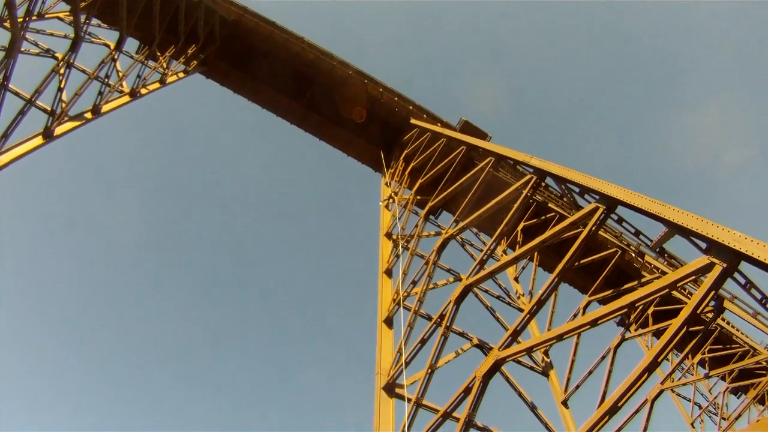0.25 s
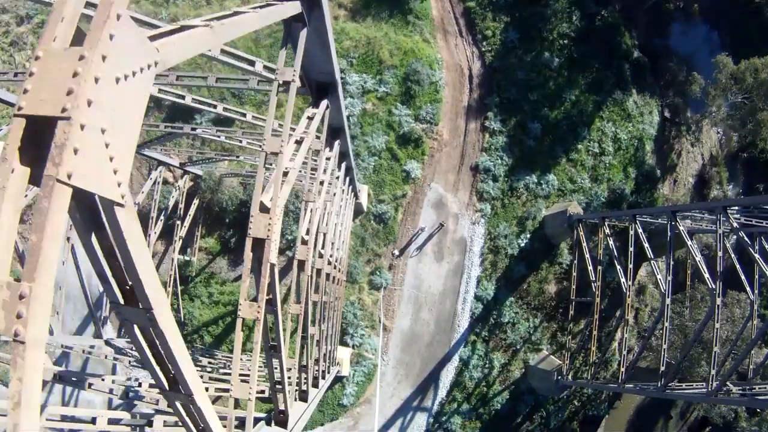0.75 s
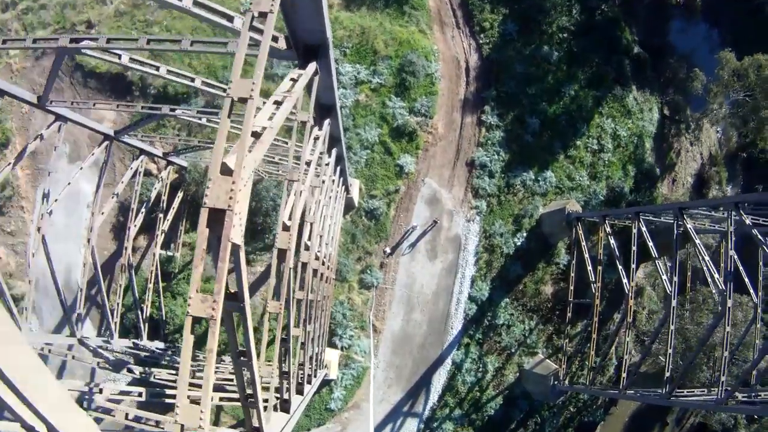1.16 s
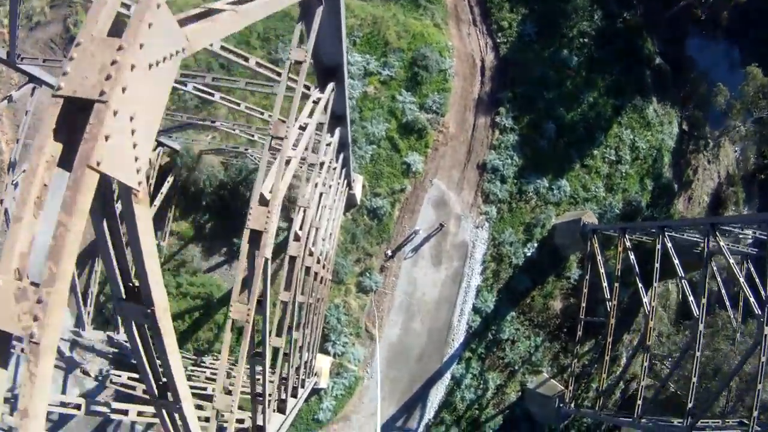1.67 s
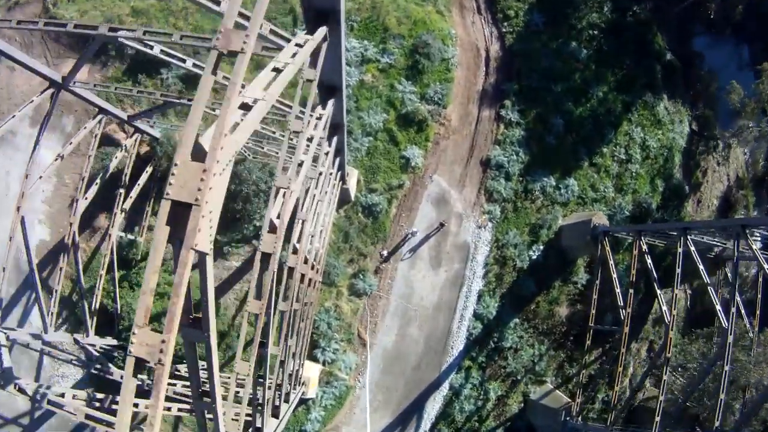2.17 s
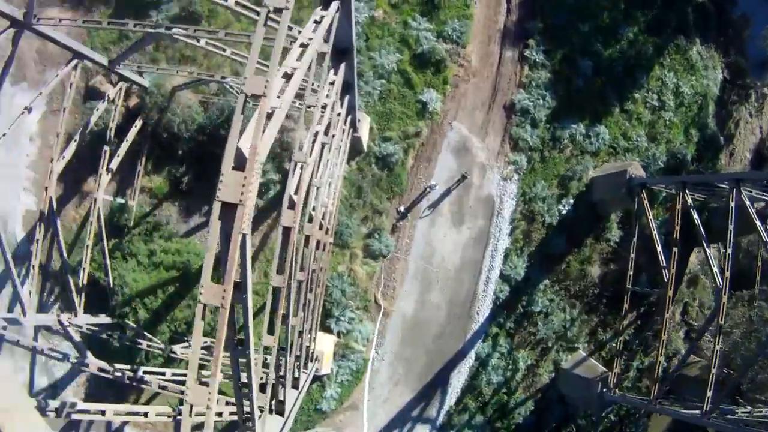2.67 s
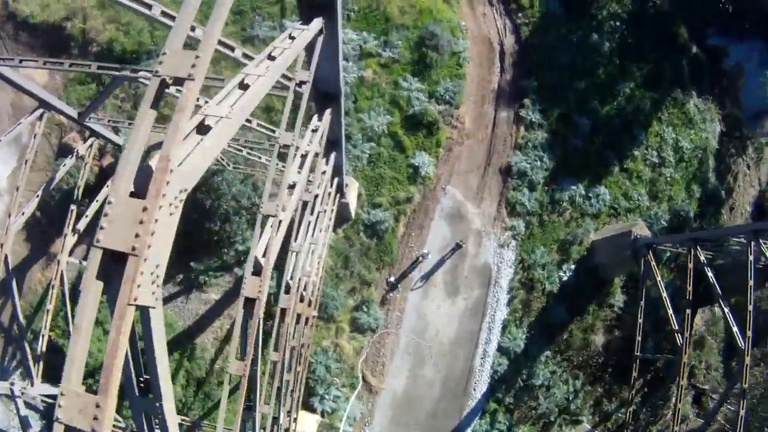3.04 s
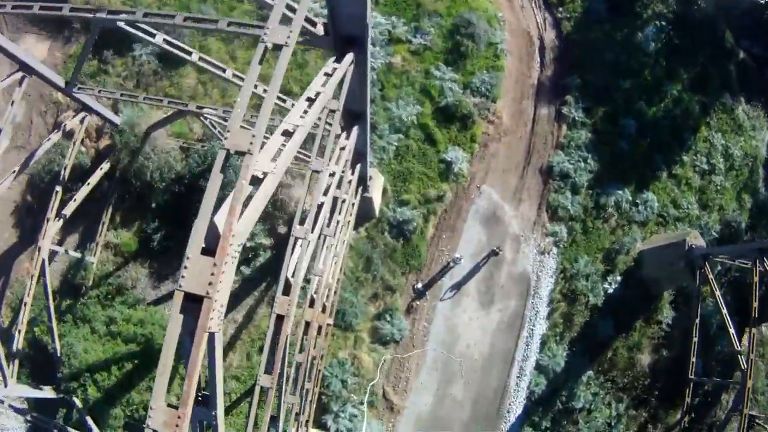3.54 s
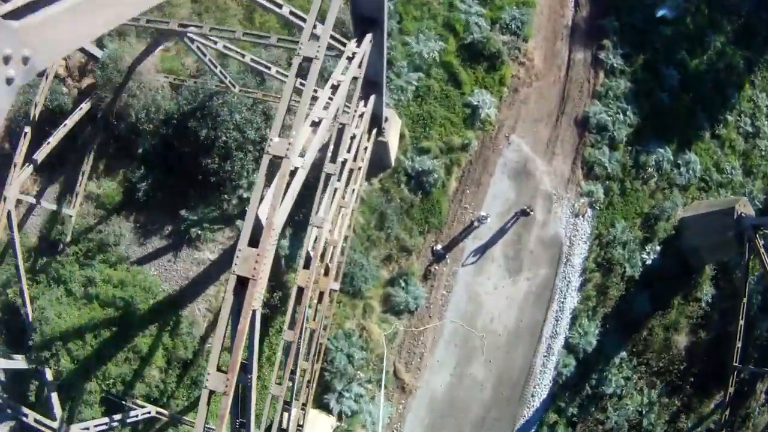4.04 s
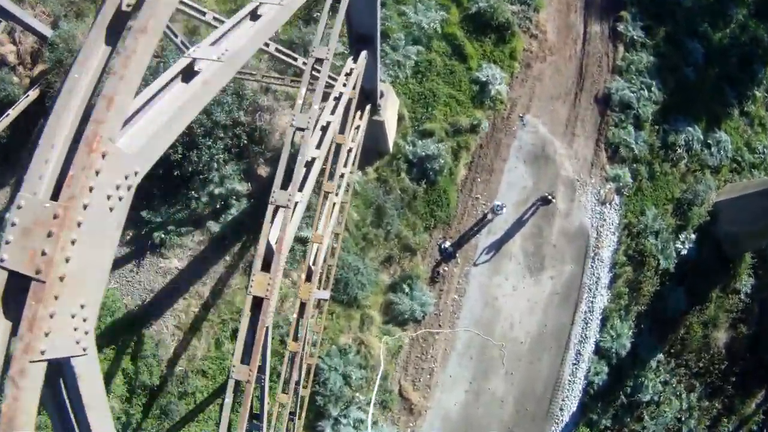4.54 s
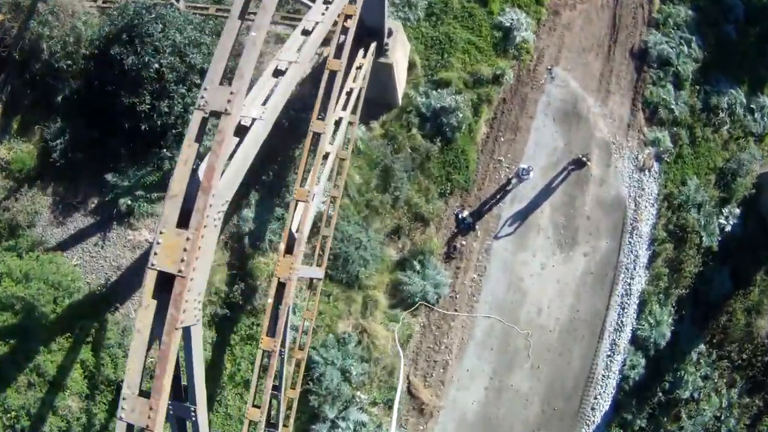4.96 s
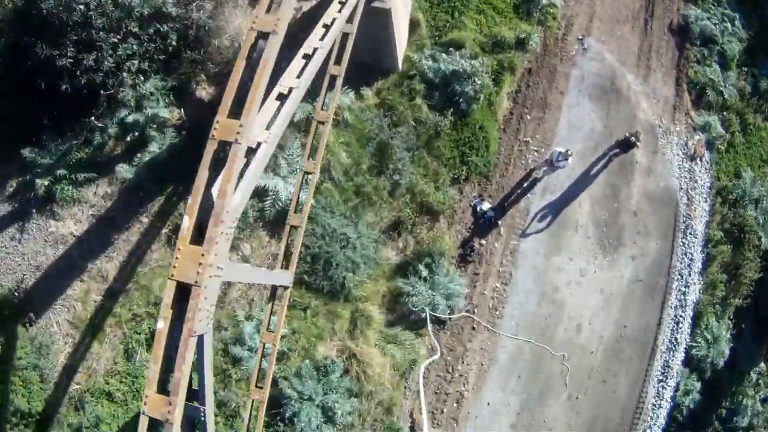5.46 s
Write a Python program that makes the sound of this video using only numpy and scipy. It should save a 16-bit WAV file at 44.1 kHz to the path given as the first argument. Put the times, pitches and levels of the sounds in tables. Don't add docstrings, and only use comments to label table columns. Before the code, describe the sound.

A quiet outdoor hush with one plastic knock cuts to a rope whining through a metal descender, rising in pitch amid thumping wind.

```python
import sys
import numpy as np
from scipy import signal
from scipy.fft import rfft, irfft, next_fast_len
from scipy.io import wavfile

SR = 44100
rng = np.random.default_rng(int(sys.argv[2]) if len(sys.argv) > 2 else 0)


def decibels_to_gain(level_db):
    exponent = np.asarray(level_db, float) / 20
    return 10 ** exponent


def waveform_to_disk(signal):
    frames = np.transpose(np.atleast_2d(signal))
    scaled = np.clip(frames, -1, 1) * 32767
    samples = np.round(scaled).astype(np.int16)
    wavfile.write(sys.argv[1], SR, samples)


N = 251502
STEPS_S = np.arange(0, N / SR + .001, .001)

# [start t/s, end t/s]
CUT_S = (.6232, .6331)


def evened(x):
    return x / np.sqrt(np.mean(x ** 2) + 1e-20)


def curves(rows):
    s, *columns = np.transpose(rows)
    return [np.interp(np.arange(N) / SR, s, c) for c in columns]


def sampled(control):
    return np.interp(np.arange(N) / SR, STEPS_S, control)


def coloured(x, points):
    f_hz, db = np.transpose(points)
    size = next_fast_len(len(x))
    bin_hz = np.fft.rfftfreq(size, 1 / SR)
    gain = decibels_to_gain(np.interp(np.log(bin_hz + 1), np.log(f_hz), db))
    return irfft(rfft(x, size) * gain, size)[:len(x)]


def drift(hz):
    lowpass = signal.butter(2, hz, fs=SR, output="sos")
    return evened(signal.sosfilt(lowpass, rng.standard_normal(N)))


def add(mix, s, sound):
    part = mix[round(s * SR):][:len(sound)]
    part += sound[:len(part)]


def jerks(rows):
    s, percent, half_ms, db = np.transpose(rows)
    bells = np.exp(-abs((STEPS_S[:, None] - s) / (half_ms / 1000)) ** 2.8)
    return sampled(bells @ percent), sampled(bells @ db)


def spells(rows):
    s, length_s, db = np.transpose(rows)
    since_s = STEPS_S[:, None] - s
    edge_s = 0.027
    shape = np.clip(np.minimum(since_s, length_s - since_s) / edge_s + .5, 0, 1) ** 2
    return sampled(20 * np.log10(shape @ decibels_to_gain(db) + 1e-9))


# [f/Hz, density/dB per Hz]
STILL_AIR = [(200, -1.5), (500, -3), (1000, -9), (2400, -8.5), (4000, -10.5), (5300, -15.5), (5900, -20)]
# [f/Hz, density/dB per Hz]
RUSH = [(300, -1), (700, -4), (2000, 0), (3600, 1.5), (4300, -5), (4900, -3.5), (5400, -7.5), (5900, -7.5)]


def air():
    still = decibels_to_gain(-62) * evened(coloured(rng.standard_normal(N), STILL_AIR))
    octaves = np.log2(curves(SPEED)[0] / 3000)
    rush_db = -69 + 2.5 * octaves - 0.05 * jerks(GRABS)[0]
    rush = decibels_to_gain(rush_db + 14.0) * evened(coloured(rng.standard_normal(N), RUSH))
    return np.where(np.arange(N) < CUT_S[1] * SR, still, rush)


# [t/s, peak level/dB, decay/ms]
GUSTS = [(0.101, -38, 45), (0.379, -39, 21), (0.649, -49, 240), (0.853, -40.5, 58), (1.214, -52, 77),
         (1.42, -52, 59), (1.567, -51, 54), (1.849, -42.5, 45), (2.038, -68, 74), (2.182, -45.5, 470),
         (2.513, -30, 50), (2.639, -46, 97), (2.752, -45, 85), (3.169, -49, 130), (3.445, -41, 58),
         (3.577, -37, 59), (3.719, -40, 72), (3.949, -40, 70), (4.24, -48.5, 48), (4.515, -35, 61),
         (4.65, -45, 70), (4.748, -38, 79), (4.979, -34, 67), (5.159, -42, 76), (5.429, -33.5, 54),
         (5.519, -48, 69), (5.629, -45.5, 70)]


def gusting():
    s, db, decay_ms = np.transpose(GUSTS)
    since_s = STEPS_S[:, None] - s
    rise_s = 0.016
    rise = np.clip(since_s / rise_s, 0, 1)
    decay = np.exp(-np.maximum(since_s - rise_s, 0) / (decay_ms / 1000))
    return sampled((rise * decay) @ decibels_to_gain(db))


# [t/s, roar level/dB]
WIND = [(0.2, -67), (1.29, -60.5), (1.47, -54), (1.62, -59.5), (1.67, -53), (2.22, -55), (2.47, -60),
        (2.56, -52.5), (3.19, -60), (3.26, -54.5), (3.48, -60.5), (4.01, -54.5), (4.09, -59), (4.92, -51.5),
        (5.07, -57), (5.19, -48.5), (5.26, -52.5), (5.7, -54)]
# [f/Hz, density/dB per Hz]
BUFFET = [(15, -6.5), (25, -1.5), (55, -0.5), (75, -11.5), (120, -23), (300, -76)]
# [f/Hz, density/dB per Hz]
ROAR = [(40, -13), (90, 2), (170, 1), (260, -8), (450, -15), (800, -19), (2000, -73)]


def wind():
    roar_db, gusts = curves(WIND)[0], gusting()
    lumps_db = 0.89 * drift(2.3)
    buffet = evened(coloured(rng.standard_normal(N), BUFFET)) * decibels_to_gain(lumps_db)
    roar_noise = rng.standard_normal(N) * decibels_to_gain(0.76 * lumps_db + 1.3 * drift(27.5))
    roar = evened(coloured(roar_noise, ROAR))
    eddies = decibels_to_gain(-52.5 + 0.74 * (roar_db - roar_db.mean())) * buffet
    envelope = abs(signal.hilbert(buffet, next_fast_len(N))[:N])
    thumps = evened(buffet / (envelope + 0.66))
    return eddies + decibels_to_gain(-7.5) * gusts * thumps + (decibels_to_gain(roar_db) + decibels_to_gain(-29.5) * gusts) * roar


# [f/Hz, level/dB, t60/s]
KNOCK_MODES = [(770, -1.5, 0.022), (1040, 2, 0.0063), (1450, -12, .0155), (1830, -2.5, 0.014),
               (2240, 7, 0.004), (2700, -7, .011), (2980, -12, 0.0071), (3300, -23, .005), (3800, -27, .01)]
# [t/s, level/dB, thump re ring/dB]
KNOCKS = [
    (.12166, -25.5, -8),
    (.12249, -20, -30),
    (.12481, -42, -12),
    (.1275, -50, -30),
    (.1372, -55, 19),
    (.1389, -44, 2),
    (.1398, -47, -4),
    (.1645, -58, 9),
    (.292, -61, 2),
    (.100, -62, 10),
]


def knocks():
    t, out = np.arange(2000) / SR, np.zeros(N)
    ring = sum(decibels_to_gain(db - 60 * t / t60_s) * np.sin(2 * np.pi * hz * t) for hz, db, t60_s in KNOCK_MODES)
    ring = signal.sosfilt(signal.butter(3, 560, "high", fs=SR, output="sos"), ring)
    thump = np.sin(2 * np.pi * 125 * t) * np.exp(-t / 0.0054)
    for s, db, thump_db in KNOCKS:
        add(out, s, decibels_to_gain(db) * (ring + decibels_to_gain(thump_db) * thump))
    return signal.sosfilt(signal.butter(4, 3150, fs=SR, output="sos"), out)


# [t/s, hiss level/dB]
RUB = [(.634, -75), (.8, -75), (1.2, -75), (1.45, -62.5), (1.6, -67), (2.0, -57.5), (2.3, -55.5),
       (2.5, -59), (2.6, -53), (2.85, -56.5), (2.9, -62.5), (3.2, -64.5), (3.27, -57.5), (3.5, -59.5),
       (4.0, -63), (4.58, -61), (4.9, -55.5), (5.7, -57)]
# [t/s, lift/dB, length/ms]
FLURRIES = [(1.296, 9, 6.95), (1.5, 4.5, 27), (1.686, 8.5, 44), (1.80, 6, 17), (1.862, 11, 46),
            (1.928, 10, 18), (2.18, 3.5, 23), (2.288, 3.5, 18), (2.557, 1.5, 67), (2.599, -1, 12),
            (2.74, 7, 5.7), (3.271, 0, 9.7), (3.346, 1, 5.8), (3.59, 5, 32), (3.909, 8.5, 38),
            (4.62, 5, 22), (4.72, 1.5, 45), (4.651, 6.5, 14.2), (5.1, -2.5, 42), (5.35, 1, 65),
            (5.5, -2.5, 40.7), (5.58, 3.5, 42)]
# [f/Hz, level/dB]
CASE = [(300, -29), (600, -13.5), (880, -7), (1150, 3.5), (1350, -2.5), (1550, 0), (2000, -2), (2500, -3),
        (2700, -4.5), (2900, -4.5), (3300, -4), (3800, -14.5), (4200, -31), (5000, -15.5), (5900, -23)]


def rub():
    lift = sum(db * np.exp(-((STEPS_S - s) / (ms / 1000)) ** 2) for s, db, ms in FLURRIES)
    uneven_db = 1.4 * drift(1130) + 1.3 * drift(27) + 1.2 * drift(130)
    grains = rng.standard_normal(N) * decibels_to_gain(sampled(lift) + uneven_db)
    after_cut = np.arange(N) / SR > CUT_S[1]
    return decibels_to_gain(curves(RUB)[0] + 5.5) * evened(coloured(grains, CASE)) * after_cut


# [t/s, peak level/dB, centre f/Hz, length/ms]
TAPS = [(0.6375, -39.5, 1110, 2.7), (0.637, -39, 1480, 1.8), (0.637, -51, 2150, 2.5),
        (1.139, -43.5, 1154, 2.8), (1.139, -36.5, 1760, 1.5), (1.296, -49, 2200, 3.3),
        (1.576, -49, 1937, 1.15), (1.93, -38.5, 1520, 5.2), (2.176, -28.5, 1567, 0.92),
        (2.165, -40, 1900, 1), (2.19, -42, 1600, 2), (2.556, -41, 1092, 14.5), (2.559, -42, 1500, 9.7),
        (2.745, -38, 1550, 2.2), (3.483, -30.5, 1652, 1.3), (3.483, -38.5, 1101, 2),
        (3.911, -45, 1480, 6.9), (4.648, -39.5, 1490, 4.3)]


def taps():
    t, out = np.arange(-300, 1200) / SR, np.zeros(N)
    rattle_band = [(600, -30)] + CASE[2:7] + [(2600, -24)]
    for s, db, hz, ms in TAPS:
        swell = np.exp(-(t / (ms / 2000)) ** 2)
        blow = swell * np.cos(2 * np.pi * hz * t + 6 * rng.random())
        rattle = evened(coloured(rng.standard_normal(len(t)), rattle_band))
        rattle = rattle * np.exp(-abs(t) / 0.0079)
        add(out, s - 240 / SR, decibels_to_gain(db) * (blow + 0.12 * rattle))
    return out


def whine(hz, db, orders, steady, smear_db):
    turn = 2 * np.pi * np.cumsum(hz * (1 + .0045 * drift(55.0))) / SR
    blur_hz = 30
    out = np.zeros(N)
    for multiple, order_db in [(1, db)] + orders:
        beads = drift(blur_hz * multiple) + 1j * drift(blur_hz * multiple)
        halo = decibels_to_gain(smear_db) * (drift(93) + 1j * drift(124))
        share = steady if multiple == 1 else 0
        body = share + (1 - share) * beads * np.minimum(1, 2 * steady) + halo
        out += decibels_to_gain(order_db) * (body * np.exp(1j * multiple * turn)).real
    return decibels_to_gain(4.5) * out * (np.arange(N) > CUT_S[1] * SR)


# [t/s, weave rate f/Hz, level/dB]
SPEED = [(.641, 1432, -70), (.84, 1716, -70), (1.01, 1930, -59), (1.17, 2024, -59), (1.35, 2304, -53),
         (1.5, 2422, -49.5), (1.62, 2637, -48.5), (1.78, 2618, -51), (1.92, 2837, -50), (2.04, 2745, -53.5),
         (2.21, 3022, -60), (2.4, 3046, -50), (2.57, 3133, -52), (3.3, 3162, -52), (3.5, 3480, -58),
         (4.6, 3430, -60), (4.8, 3653, -53), (5.703, 3715, -51.5)]
# [t/s, speed change/%, half length/ms, level change/dB]
GRABS = [(.745, -3.5, 30, 3), (.795, 1, 14.5, 3), (.82, 0, 8, -8), (.855, .5, 26, 6), (.9, 0, 8, -5.5),
         (.96, -5, 22, -3), (.985, 1, 8, 0), (.998, 0, 9, -15), (1.02, 0, 10, 1), (1.08, 0, 10, 4.5),
         (1.19, -1, 16.6, -7), (1.243, 0, 12, -10), (1.267, 0, 9, 3), (1.285, 0, 8, -14), (1.3, 0, 8, 1),
         (1.34, -1.5, 29, 0), (1.475, -1.5, 15.5, 3.5), (1.563, 0, 11, -11.5), (1.887, -2, 15.4, 6),
         (2.61, -7.5, 16, -3), (2.645, -3, 19.5, 6.5), (2.678, -1, 11, -7), (2.697, -10, 18, -2.5),
         (2.735, -16, 39, 6), (2.77, 0, 6, -12), (2.975, -6, 22, -3.5), (3.06, -13.5, 27, -2),
         (3.085, -2, 7.8, 1), (3.13, -3, 19, -3.5), (3.34, -5, 18.4, 0), (3.46, -6.5, 14, -8),
         (3.7, -2.5, 14, 6), (3.737, -9, 26, 0), (3.82, -3, 19, 3), (3.865, -5.5, 22, -0.5),
         (3.985, -7, 20, 6), (4.04, -11.5, 56, 4.5), (4.07, -0.5, 14.2, 2), (4.15, -6, 45, 3),
         (4.15, 0.5, 12.2, 3.5), (4.4, -4.5, 37.2, 4.5), (4.59, -2, 25.6, -2), (4.87, -2, 18, -1),
         (4.98, -2.5, 18, -7), (5.085, -2.5, 19.3, 3), (5.3, -1, 10.5, 4), (5.33, -5, 15.6, -6.5),
         (5.405, -7, 15.3, 1), (5.458, 0, 4.9, -13.5), (5.5, -2, 11.7, 3), (5.604, -0.5, 7.7, 7.5),
         (5.617, -17.5, 27.4, 2.5), (5.621, 0.5, 7, -8)]
# [t/s, speed change/%, half length/ms, level change/dB]
SNAGS = [(1.41, 1.5, 36.5, 0), (1.456, -0.3, 4.3, -8), (1.5, -1.3, 25.3, -1.5), (1.607, -0.3, 5, -6),
         (1.625, -1.5, 17.7, -4), (1.65, 1, 15, 3), (1.667, 1, 3.96, -17), (1.785, -3.5, 24, -1),
         (1.82, -0.5, 10.2, 0.5), (1.85, -0.068, 13, -10), (2.005, -0.8, 14.7, -10), (2.04, -2, 14.3, 3.5),
         (2.075, -1.3, 18, 6.5), (2.13, -0.1, 15, 0), (2.155, -1.3, 15.7, 7), (2.195, -0.1, 12, -8),
         (2.285, 0.5, 23, 1), (2.318, 0, 7, -13.5), (2.38, -0.088, 15, -9), (2.5, 0.1, 6.6, -6),
         (2.545, 0.099, 12, 4)]
# [t/s, speed change/%, half length/ms, level change/dB]
SURGES = [(1.843, 2.5, 21.3, 0), (2.795, 2.5, 14.8, 8), (2.85, 5, 32, -8), (2.89, 4, 25.6, -1.5),
          (2.925, 0.36, 18.4, 7.5), (3.175, 4, 10.77, -1), (3.24, -1, 20, 1.5), (3.31, -1, 7.9, -5.5),
          (3.39, 1.25, 18.2, 3.5), (3.44, -2, 10.4, -11), (3.49, 0, 9.4, 2.5), (3.545, -1.5, 19.3, 1),
          (3.63, 3, 21.15, -11), (3.778, 1, 14.2, 3.5), (3.91, 2.5, 15, 0), (3.94, 0.84, 11.4, -19.5),
          (4.25, 3, 26.5, 2), (4.31, -0.4, 14.7, -15.5), (4.485, 3.5, 29, 7), (4.525, -1, 15.6, 5),
          (4.64, 3, 15.4, 7.5), (4.74, 1, 10.1, 0.5), (4.792, 2.5, 21, 3), (4.835, -2, 14.3, 4),
          (4.885, 0, 6, -7.5), (4.91, -0.5, 14, 6.5), (4.935, 2, 15.2, 3), (5.055, 0.5, 14.6, 1.5),
          (5.11, -0.5, 8.7, 3), (5.205, 11.5, 66, -14), (5.36, 0, 22.7, -8), (5.443, 2.5, 12.6, 0),
          (5.472, 3, 10, 1), (5.672, 6, 9.5, -3)]
# [start t/s, length/s, level/dB]
TOUCHES = [(.652, .03, -68), (.76, .13, -73), (1.01, 0.11, -68), (1.2, .04, -64), (1.3, .25, -63.5),
           (1.6, 0.15, -64), (1.95, 0.18, -65), (2.42, 0.19, -58), (2.805, 0.1, -58.5), (3.39, 1.24, -57),
           (4.72, 0.426, -58), (5.29, .28, -57)]
# [t/s, speed change/%, half length/ms, level change/dB]
SECOND_SLIPS = [(.665, -5, 30, 2), (1.12, 3, 140, -3), (1.33, 3, 50, 0), (1.68, 3.5, 97, 0),
                (2.04, 8.5, 100, 0), (2.5, 10, 130, -2), (2.83, 4.5, 14, 0), (2.852, 22, 35, 1),
                (3.42, 2, 13.8, 3), (3.46, -11.5, 19, 0), (3.545, -4.5, 25.6, 0), (3.6, 2, 23, -1.5),
                (3.66, -0.3, 15, -5), (3.79, 1.4, 43, -9), (3.86, -7, 16.8, 5.5), (3.965, -14.5, 24, 2),
                (3.988, -0.4, 8.3, -12), (4.03, 1.5, 31, -2), (4.16, 0.3, 91, -6), (4.3, -1, 26, 0.5),
                (4.35, 3, 16.02, 3), (4.41, -4.5, 19.7, -1), (4.5, -1.5, 13.7, 4), (4.54, -.5, 19, 7.5),
                (4.79, 4.5, 29.7, -2), (4.89, 1.5, 36, -6.5), (4.95, 4.5, 15.3, 5.5),
                (4.985, -4.5, 21.2, 3), (5.02, 0, 12, 6), (5.325, 10.5, 13.7, 1.5), (5.375, 4.5, 11.3, 6.5),
                (5.41, -6, 13.2, 2), (5.472, 2.5, 21, 7), (5.535, 16, 24.7, 2)]
PATTERNS = {.75: [(.64, 1.4, -85), (1.9, 3.9, -72.5), (1.99, .6, -74.5), (2.07, 0.049, -66),
            (2.27, 0.1, -71), (3.09, 0.045, -64), (3.64, 0.056, -66.5), (3.78, 0.065, -69),
            (5.17, 0.092, -65)], 1.24: [(.76, 0.24, -77), (2.15, 0.58, -71.5), (2.76, 0.48, -75)],
            1.8: [(.65, 0.023, -67), (.925, 0.071, -67.5)], 2: [(.64, 6.2, -74.5), (.765, 0.06, -86),
            (.93, .11, -78), (1.2, 0.59, -85), (2.67, .07, -70), (2.74, .05, -76)]}


def bars():
    hz, db = curves(SPEED)
    grab, grab_db = jerks(GRABS + SNAGS)
    surge, surge_db = jerks(SURGES)
    slip, slip_db = jerks(SECOND_SLIPS)
    clean, smear_db = .78, -9
    lifted = np.clip(surge_db / -18, 0, 1)
    main_steady = clean + (.1 - clean) * lifted
    main_smear_db = smear_db + (3 - smear_db) * lifted
    orders = [(multiple, spells(rows)) for multiple, rows in PATTERNS.items()]
    main_hz = hz * (1 + (grab + surge) / 100)
    main = whine(main_hz, db + grab_db + surge_db, orders, main_steady, main_smear_db)
    second_hz = .94 * hz * (1 + slip / 100)
    return main + whine(second_hz, spells(TOUCHES) + slip_db, [], clean, smear_db)


# [f/Hz, level/dB]
NOTCH = [(2450, 0), (2620, 1), (2880, -5.5), (3080, -2.5), (4720, -2.5), (4920, 1), (5120, -1.5)]


def scene():
    mono = coloured(bars() + rub() + air(), NOTCH) + wind() + knocks() + taps()
    return np.array([mono, mono])


def roll_off(x):
    return signal.sosfilt(signal.butter(12, 16530, fs=SR, output="sos"), x)


def record(dry):
    low = signal.resample_poly(dry, 40, 147, axis=1)
    held = signal.resample_poly(np.repeat(low, 4, axis=1), 147, 160, axis=1)[:, :N]
    t = np.arange(N) / SR
    fade = np.clip((CUT_S[0] - t) / .003, .06, 1)
    cut = np.where(t < CUT_S[1], fade, 1)
    edge = signal.firwin(801, 15270, window=("kaiser", 9), fs=SR)
    limited = signal.oaconvolve(held * cut, edge[None], "same")
    grit_band = [(30, -62), (300, 6.0), (1500, -2.5), (5500, -4.0), (9000, -9.5), (14000, -33)]
    grit = decibels_to_gain(-84 + 3.6 * drift(7.1)) * evened(coloured(rng.standard_normal(N), grit_band))
    return roll_off(limited + np.array([[1], [-1]]) * grit * cut)


dry = scene()
out = record(dry)
waveform_to_disk(out)
```